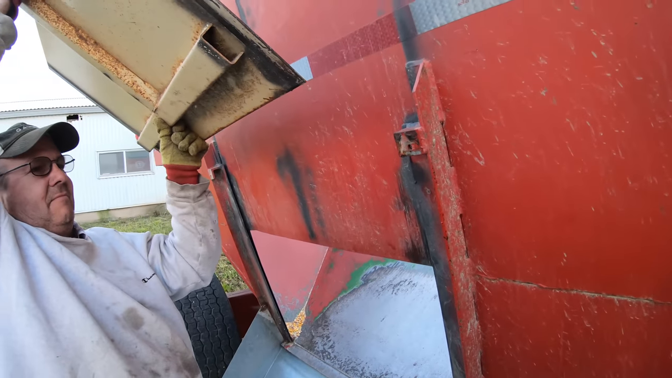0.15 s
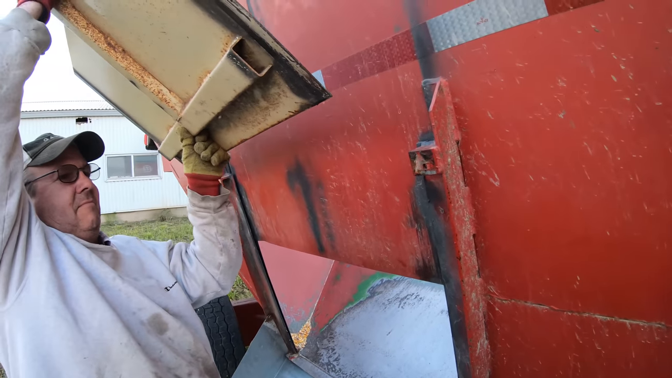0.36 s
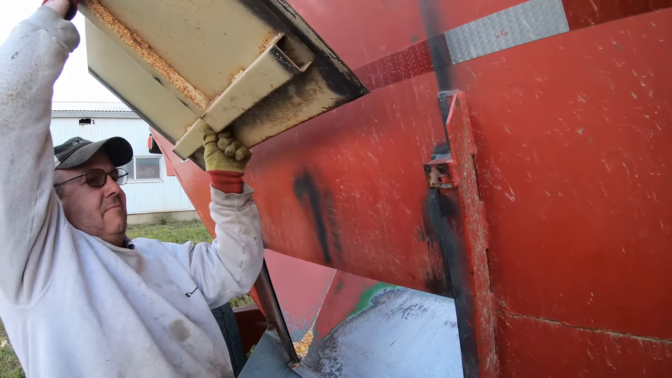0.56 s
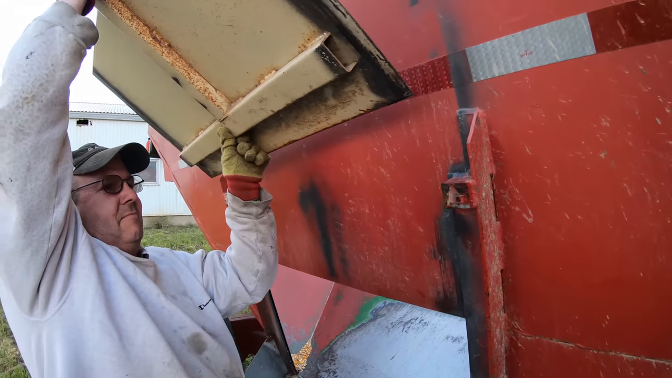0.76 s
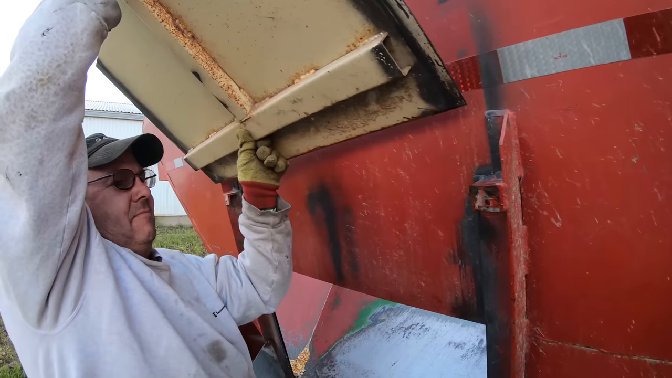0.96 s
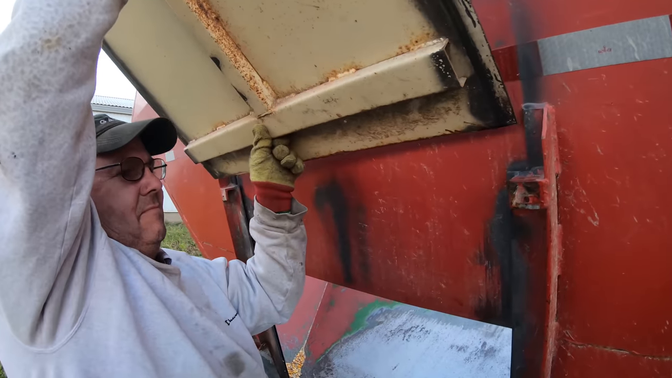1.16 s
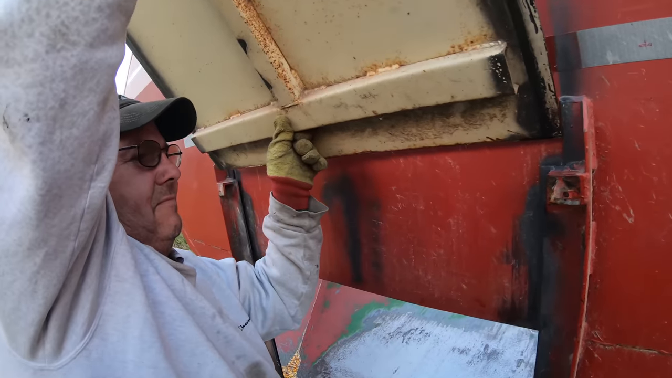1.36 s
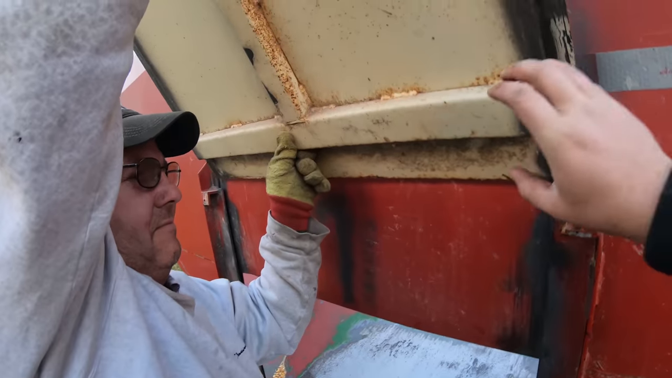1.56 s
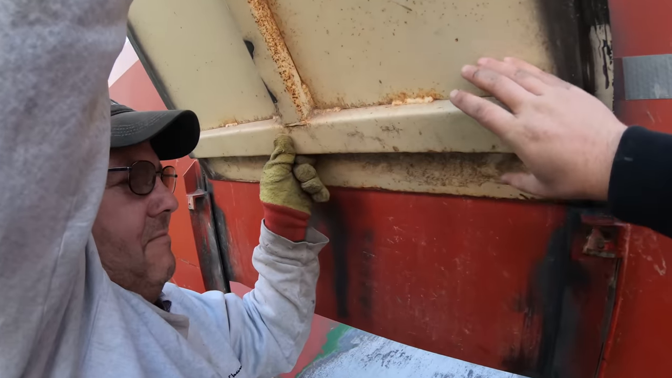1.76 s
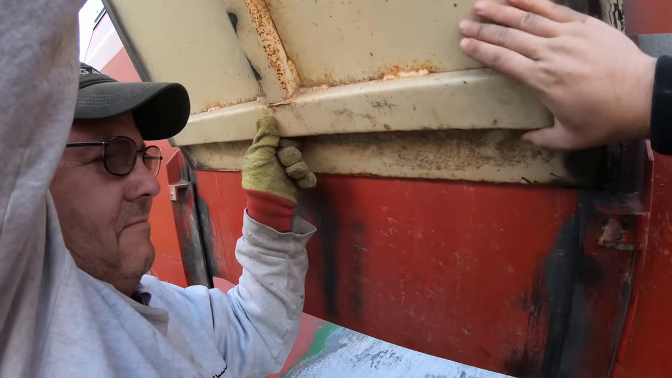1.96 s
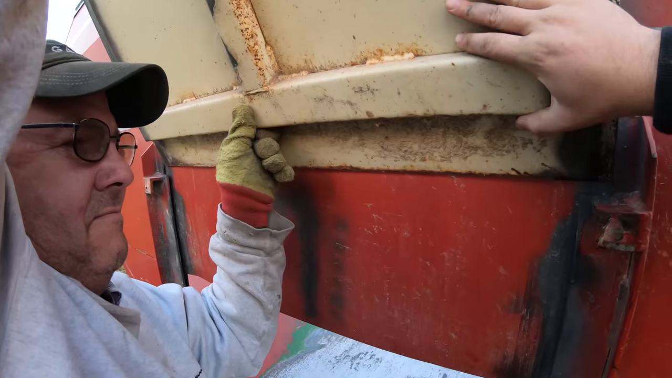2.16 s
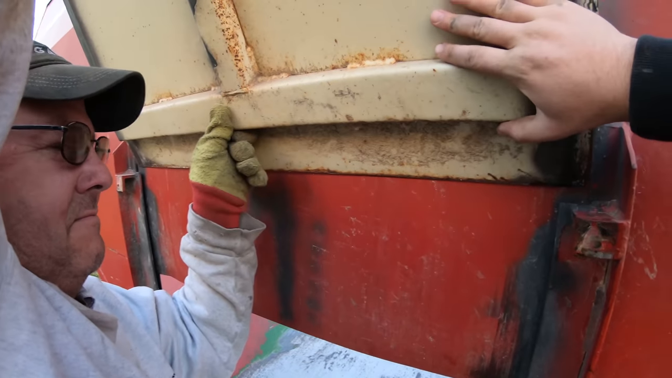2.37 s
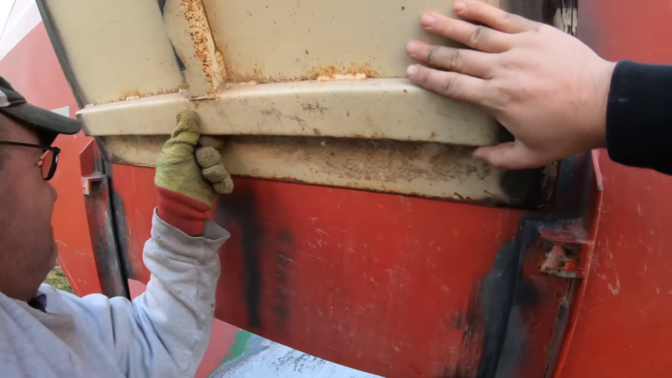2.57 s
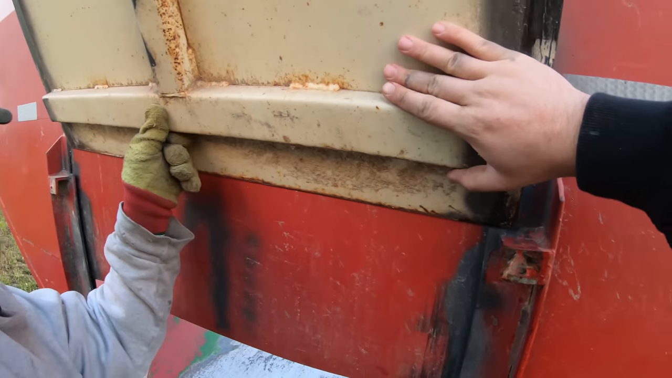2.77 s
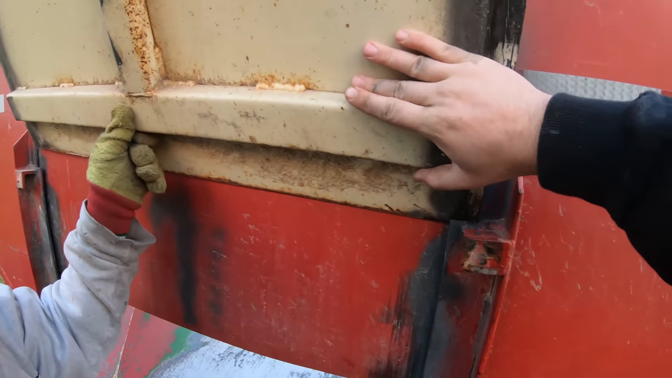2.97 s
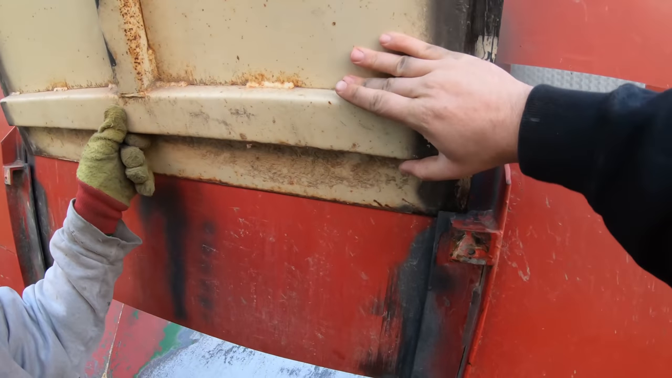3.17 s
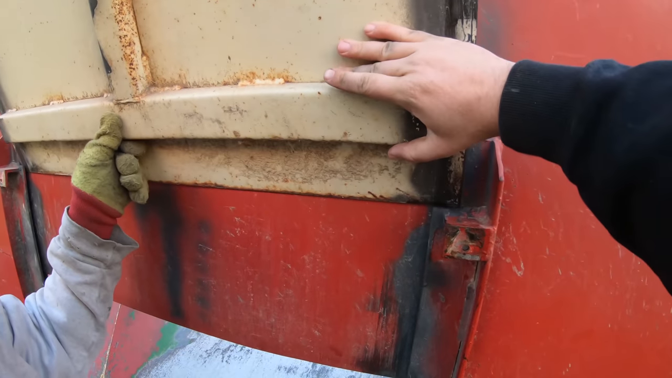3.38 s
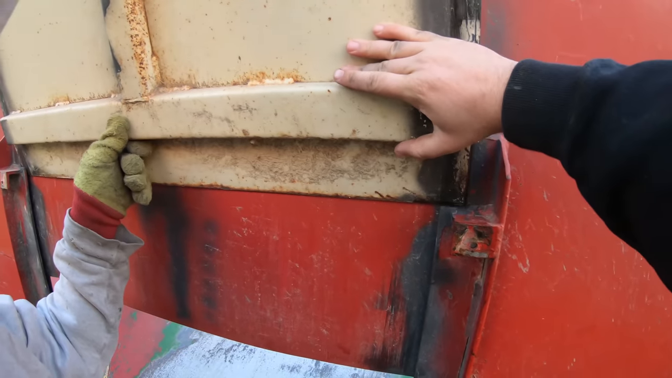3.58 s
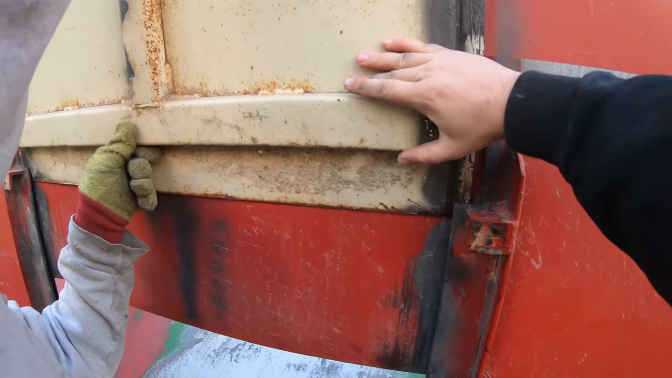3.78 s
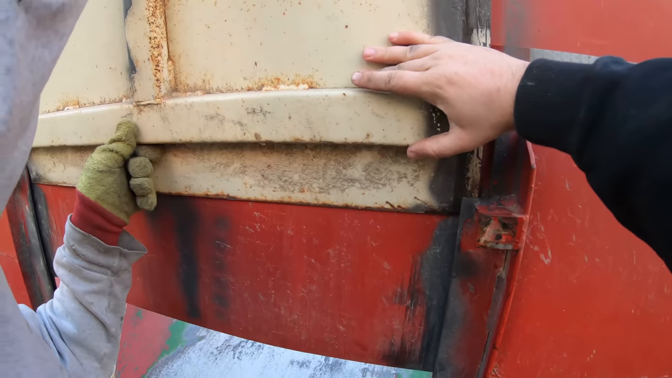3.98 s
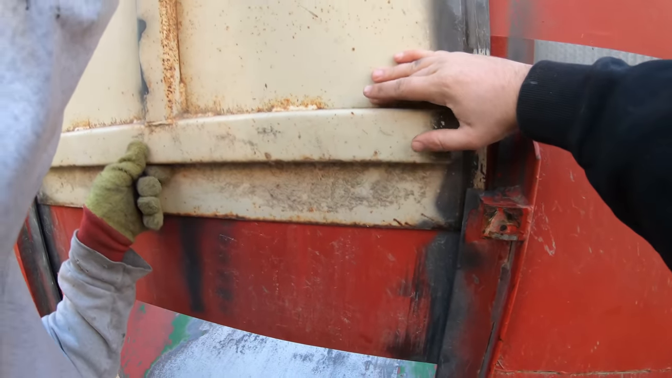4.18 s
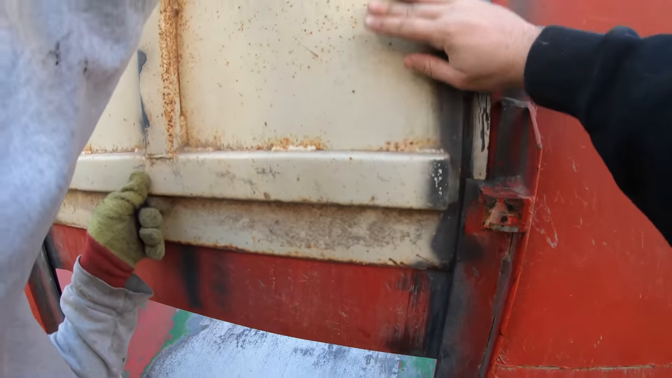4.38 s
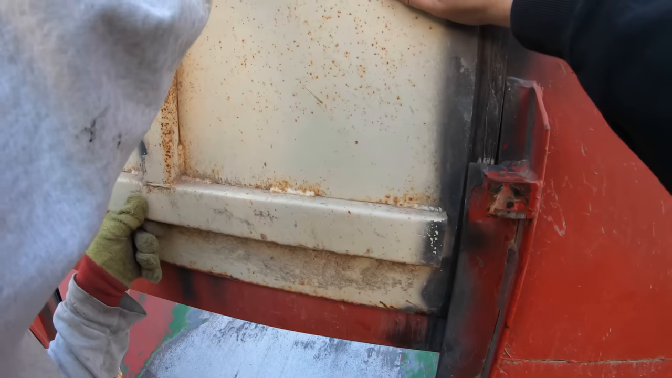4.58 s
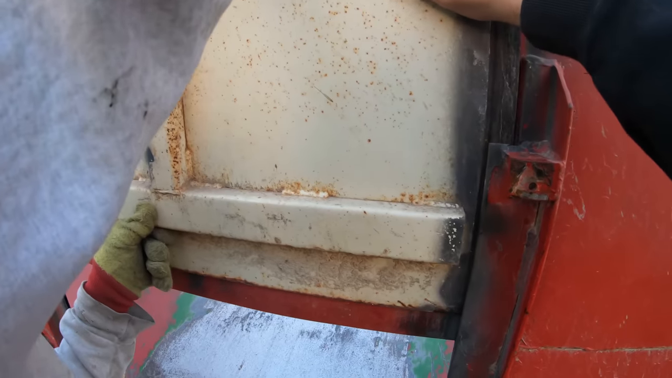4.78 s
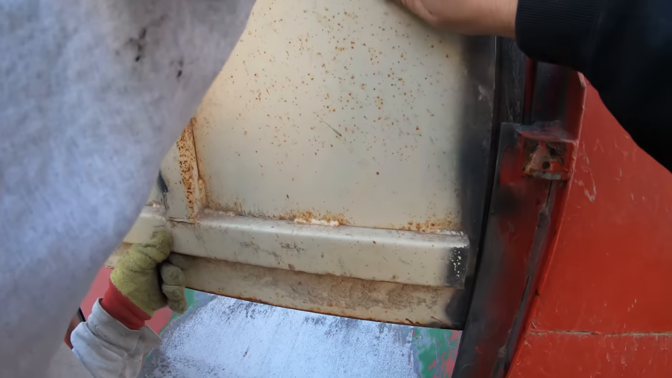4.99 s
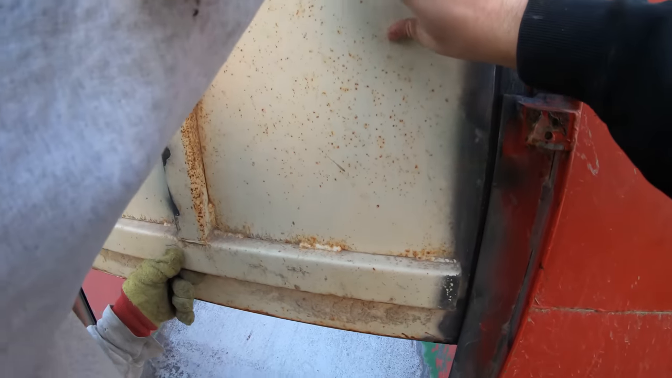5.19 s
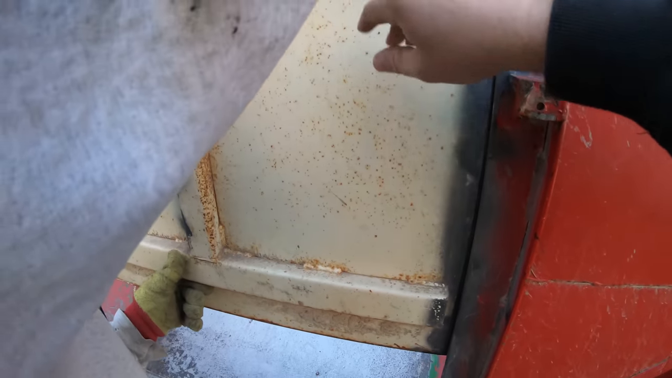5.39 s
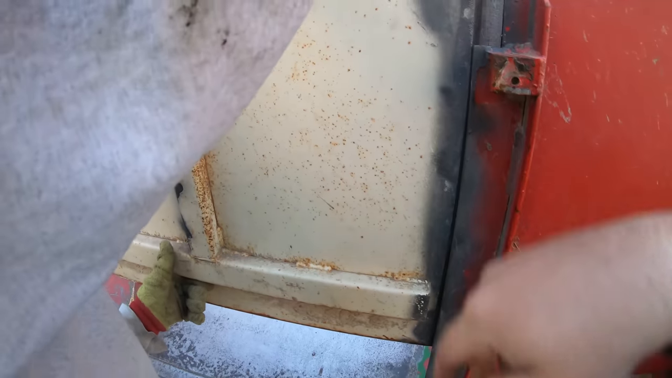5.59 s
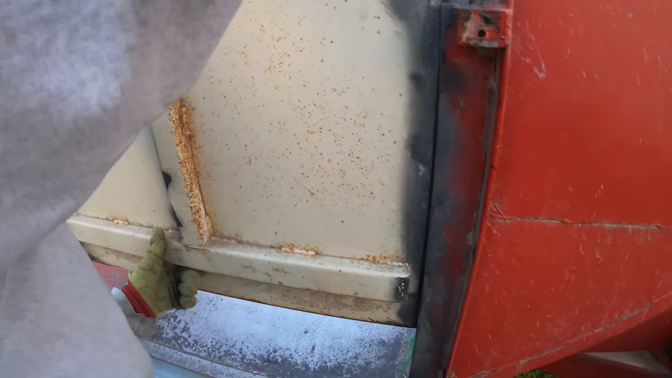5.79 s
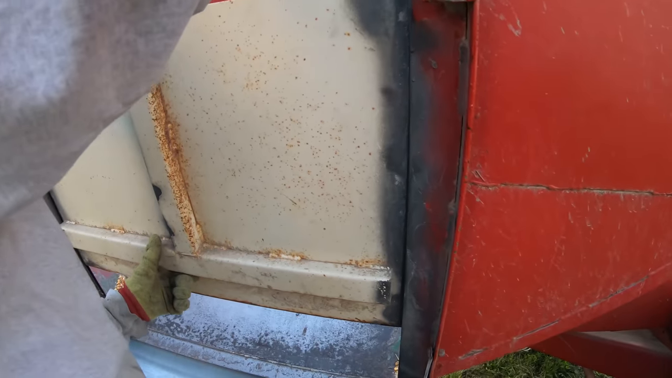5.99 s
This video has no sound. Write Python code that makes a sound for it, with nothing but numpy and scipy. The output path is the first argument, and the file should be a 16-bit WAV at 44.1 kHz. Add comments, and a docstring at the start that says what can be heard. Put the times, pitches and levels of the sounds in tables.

```python
"""A heavy steel slide gate is worked down its rusty track by hand, outdoors on a farm.
From the start: quiet yard air (steady noise) and light wind on the microphone (swaying low noise).
From 1.4 s the plate knocks in its track (struck modes) and scuffs (streams of tiny blows on those modes).
At 2.1 s its edge squeaks (stick-slip pulses in resonances), again very faintly at 2.8 s.
From 4 s it grinds downward on the scuffs' mechanism, catching and banging to the end."""
import sys
import numpy as np
from scipy import signal
from scipy.fft import rfft, irfft, next_fast_len
from scipy.io import wavfile

SR = 44100
rng = np.random.default_rng(int(sys.argv[2]) if len(sys.argv) > 2 else 0)


def write(x):
    x = np.atleast_2d(x).T
    wavfile.write(sys.argv[1], SR, np.round(np.clip(x, -1, 1) * 32767).astype(np.int16))


N = 266452
T = np.arange(N) / SR
RING_T = T[:SR]   # one second for each ring

# wind on the microphone: time_s, sway_db, rumble_db (before trim and gusts)
WIND = [(0.25, -16.5, -47.5), (0.7, -25, -45.5), (1.1, -24, -53.5), (1.7, -28, -48), (2.6, -24.5, -34),
        (2.9, -31, -43), (3.8, -22.5, -42.5), (4.1, -33.5, -43.5), (6.04, -18, -43.5)]
# wind rumble spectrum: freq_hz, relative_db_per_hz
WIND_COLOUR = [(8, -2), (22, 0.5), (40, -2), (70, -12), (130, -20), (300, -34.5), (1000, -84)]
# slow pressure swings, below hearing: freq_hz, relative_db_per_hz
SWAY_COLOUR = [(1, -15), (4, 0), (7, -2), (12, -18), (20, -45), (60, -110)]
# outdoor background spectrum: freq_hz, relative_db_per_hz
YARD_COLOUR = [(47, -34), (80, 5), (186, 0.5), (316, -3.5), (422, -3.5), (629, -8.5), (1250, -8.5),
               (1460, -12), (1600, -11.5), (3000, -20), (7000, -25), (16000, -32)]
YARD_DB = -55

# strongest plate modes: freq_hz, level_db, t60_s
PLATE_MODES = [(85.3, -16.5, 0.63), (130.5, -4, 0.9), (155.3, 3.5, 0.14), (170.3, -4.5, 0.61),
               (212.7, -7.5, 0.59), (245.5, -9, 0.41), (346, -1.5, 0.39), (364.5, -1, 0.77),
               (461.8, 8, 0.2), (533, -8, 1), (578, 0, 0.64), (637, -2.5, 0.47), (780, 3, 0.39),
               (751, -1, 0.14), (800, -6, 0.16), (946, 4.5, 0.16), (1061, 0, 0.29), (1020, 3, 0.26),
               (1126, 9, 0.06), (1271, 5.5, 0.21), (1386, -20, 0.86), (1520, -4, 0.33), (1908, -7, 0.13),
               (2260, -12, 0.29), (2814, -8, 0.2), (3146, -5.5, 0.041), (3340, -6, 0.11), (4350, -20, 0.34),
               (5950, -19, 0.24)]
# crowd of weaker modes, also the crunch spectrum: freq_hz, level_db
CROWD = [(70, -11), (200, -11), (300, -9.5), (470, -2.5), (700, -9), (860, -9), (1150, -7.5), (1650, -12),
         (2200, -19.5), (3400, -19), (6000, -26.5), (8500, -24.5), (10500, -35.5), (16000, -34)]
# decay of the crowd: freq_hz, t60_s
CROWD_T60 = [(70, 0.47), (300, 0.75), (1200, 0.49), (2500, 0.23), (5000, 0.13), (16000, 0.12)]
# registers of the plate, boom to edge: low_hz, high_hz
REGISTERS_HZ = [(65, 280), (280, 750), (750, 2000), (2000, 5500), (5500, 17000)]

# plate knocks on the track: time_s, strength_db, boom_re_strength_db, brightness_db_per_octave, seat_s
KNOCKS = [(1.401,-46,-6,2.5,0.016), (1.527,-49.5,-12,2,0.0021), (1.576,-38,3,2.2,0.0033),
          (1.706,-31.5,-3,-2,0.0018), (1.731,-22.5,7,-2.5,0.0012), (2.241,-20,-3,3.5,0.00022),
          (2.326,-23,5,-2.5,0.00062), (2.386,-26.5,-2,-1.55,0.0022), (3.007,-34,11,1,0.0055),
          (3.068,-43,18,5.5,0.0015), (3.241,-39,4.5,-1.8,0.0029), (3.364,-37.5,-4,-0.1,0.0078),
          (3.425,-49.5,9.5,2.4,0.0054), (3.713,-30.5,0,1.5,0.0064), (4.226,-26,-11,1.4,0.013),
          (4.301,-21,-1,1.5,0.0023), (4.362,-17,1.5,2.5,0.00072), (4.394,-32,6,5.5,0.0024),
          (4.583,-12.5,-4.5,-2,0.00074), (4.607,-25.5,3,1.2,0.0014), (4.642,-35.5,18.5,-1,.001),
          (4.762,-33.5,5,-8,.0024), (5.317,-23.5,-3.5,-1,0.0043), (5.4,-15.5,-0.5,-1,0.00046),
          (5.429,-29.5,8.5,-5,0.0018), (5.547,-26.5,9,-4,0.00047)]
# average knock, above the boom: freq_hz, register_level_db
KNOCK_COLOUR = [(460, 0.5), (1200, -0.14), (3300, -7.5), (9700, -20.5)]
# main flexing tone, set by where the rails hold the plate: time_s, pitch_hz
FLEX = [(1.73, 170), (2.24, 133.8), (3.0, 174), (3.71, 179.4), (4.36, 150), (4.58, 171.2), (4.77, 167),
        (5.4, 131.6), (5.55, 174)]
PIVOT_HZ = 696   # brightness tilts a knock about this pitch
JOLT_HZ, JOLT_DB, JOLT_T60_S = 32, -7, 0.46   # low thud that a knock sends to the microphone
KNOCK_TOP_HZ = 12500   # paint and rust dull the very top of a blow

# low rumble of the moving plate: time_s, level_db
RUMBLE = [(1.4, -60), (1.7, -34), (1.95, -28.5), (2.5, -31.5), (2.8, -38.5), (3.95, -41), (4.7, -22.5),
          (5.3, -28.5), (6.04, -31)]
# brief scuffs while the gate is lined up: start_s, length_s, grind_db, hiss_db
SCUFFS = [(1.741, .005, -43, -48), (1.78, 0.054, -43, -60), (1.938, 0.038, -35, -57),
          (2.041, .06, -35, -49), (2.188, 0.046, -39, -53.5), (2.52, 0.085, -47, -57.5),
          (2.631, 0.064, -41, -52.5), (2.919, 0.06, -48.5, -62), (3.078, .005, -40, -45),
          (3.659, 0.05, -44.5, -56.5), (3.762, 0.039, -55, -57.5), (3.976, 0.017, -38, -45)]
SCUFF_RISE_DB_PER_S, SCUFF_FALL_DB_PER_S = 350, 302
# long uneven slide down the track: time_s, grind_db, grit_hiss_db
SLIDE = [(4.04, -40.5, -83), (4.09, -29.5, -61), (4.2, -23.5, -45.5), (4.25, -17.5, -34), (4.3, -19.5, -40),
         (4.36, -35, -42.5), (4.53, -20.5, -31.5), (4.69, -38.5, -52), (4.8, -27.5, -44.5), (4.9, -24, -43),
         (4.98, -20, -39.5), (5.11, -23, -43.5), (5.22, -24.5, -33), (5.53, -29, -44.5),
         (5.66, -50.5, -57.5), (5.79, -26.5, -42.5), (5.96, -27, -36.5), (6.04, -30.5, -41)]
# rail chatter under the sliding plate: time_s, pitch_hz
CHATTER = [(4.05, 606.7), (4.25, 671.5), (4.55, 537.4), (4.85, 604), (4.98, 760), (5.1, 894.4), (5.2, 805),
           (5.45, 720), (5.7, 575.2), (6.04, 943)]
# colour of the scrape: freq_hz, gain_db
SCRAPE_COLOUR = [(60, 0), (150, -1), (300, -5.5), (600, -8), (1200, -6.5), (2200, -0.5), (3500, -1.5),
                 (5500, -2.5), (8500, -3), (10500, -3.5), (13000, -3), (16000, -12)]

# dry squeaks of the edge: start_s, length_s, level_db, peak_slips_per_s
SQUEAKS = [(2.075, .04, -31.5, 150), (2.762, .11, -63.5, 430)]
# resonances of the squeaking edge: freq_hz, single_pass_width_hz, level_db
SQUEAK_MODES = [(1060, 360, 4.5), (1330, 140, 5), (2110, 200, 8.5), (2422, 170, 6.5), (3170, 150, -3),
                (3900, 200, -7), (6100, 280, -5.5), (7600, 700, -16.5)]
SQUEAK_RISE_DB_PER_S, SQUEAK_FALL_DB_PER_S = 240, 115
SLIP_OCTAVES_PER_DB = 0.4   # slips slow down as the squeak weakens

CUTOFF_HZ = 15850


def from_db(db):
    """Decibels to gain."""
    return 10 ** (np.asarray(db) / 20)


def rms_one(x):
    """x scaled to unit rms."""
    return x / np.sqrt(np.mean(x ** 2) + 1e-20)


def in_time(rows):
    """The columns of a curve, sample by sample."""
    time_s, *columns = np.transpose(rows)
    return [np.interp(T, time_s, column) for column in columns]


def at_hz(points, hz):
    """A curve read on a log-frequency axis."""
    point_hz, value = np.transpose(points)
    return np.interp(np.log(np.maximum(hz, 1)), np.log(point_hz), value)


def coloured(x, spectrum):
    """x shaped by a smooth spectrum."""
    size = next_fast_len(len(x) + 4096, True)
    gain = from_db(at_hz(spectrum, np.fft.rfftfreq(size, 1 / SR)))
    return irfft(rfft(x, size) * gain, size)[:len(x)]


def noise(spectrum, size=N):
    """Coloured noise of unit rms."""
    return rms_one(coloured(rng.standard_normal(size), spectrum))


def drift(rate_per_s):
    """Chance curve of unit rms: random points, rate_per_s of them a second, joined by lines."""
    return rms_one(np.interp(T * rate_per_s, np.arange(4096), rng.standard_normal(4096)))


def swell(start_s, length_s, rise_db_per_s, fall_db_per_s):
    """Rise, hold and fall of one rub, in dB below its top."""
    before_s = np.maximum(start_s - T, 0)
    after_s = np.maximum(T - start_s - length_s, 0)
    return -np.minimum(rise_db_per_s * before_s + fall_db_per_s * after_s, 120)


def decay(t60_s):
    """Exponential decay, 60 dB in t60_s."""
    return np.exp(-np.log(1000) * RING_T / t60_s)


def dying_tone(hz, t60_s):
    """One struck sine, dying away."""
    return np.sin(2 * np.pi * hz * RING_T) * decay(t60_s)


def outdoors(gust_db=6.5, gusts_per_s=7.8, rumble_trim_db=6.0):
    """Quiet yard air, and lumpy wind pressure on the microphone."""
    sway_db, rumble_db = in_time(WIND)
    gusty_db = rumble_db + rumble_trim_db + gust_db * drift(gusts_per_s)
    rumble = from_db(gusty_db) * noise(WIND_COLOUR)
    sway = from_db(sway_db) * noise(SWAY_COLOUR)
    ease_in = np.minimum(T / .03, 1)
    return ease_in * (rumble + sway) + from_db(YARD_DB) * noise(YARD_COLOUR)


def plate_modes(count=420):
    """Every plate mode as a decaying sine; weak ones crowd in between the strong ones."""
    place = (np.arange(count) + rng.random(count)) / count
    crowd_hz = 70 + 16000 * place ** 2
    crowd = np.c_[crowd_hz, at_hz(CROWD, crowd_hz), at_hz(CROWD_T60, crowd_hz)]
    hz, db, t60_s = np.vstack([PLATE_MODES, crowd]).T[:, :, None].astype(np.float32)
    t = RING_T.astype(np.float32)
    return from_db(db) * np.exp(-float(np.log(1000)) * t / t60_s) * np.sin(2 * np.pi * hz * t)


def touch(modes, crunch_db, crunch_t60_s, vary_db=4.0):
    """Response to one contact, by register: each spot weights the modes anew, and rust crunches under it."""
    signs = rng.choice([-1, 1], len(modes))
    weights = signs * from_db(vary_db * rng.standard_normal(len(modes)))
    ring = weights.astype(np.float32) @ modes
    crunch = from_db(crunch_db) * noise(CROWD, size=len(RING_T)) * decay(crunch_t60_s)
    bands = [signal.butter(3, edges_hz, "band", fs=SR, output="sos") for edges_hz in REGISTERS_HZ]
    return np.array([signal.sosfilt(band, ring + crunch) for band in bands])


def knocks(modes, flex_db=-0.9, flex_t60_s=0.4, boom_db=-1.5):
    """The plate swings against the track; edge-on blows are bright, flat ones boom, glancing ones seat slowly."""
    out = np.zeros(N + len(RING_T))
    centres_hz = np.sqrt(np.prod(REGISTERS_HZ, axis=1))
    jolt = from_db(JOLT_DB) * dying_tone(JOLT_HZ, JOLT_T60_S)
    for time_s, strength_db, boom_re_strength_db, brightness_db_per_octave, seat_s in KNOCKS:
        tilt_db = brightness_db_per_octave * np.log2(centres_hz / PIVOT_HZ)
        register_db = at_hz(KNOCK_COLOUR, centres_hz) + tilt_db
        register_db[0] = boom_re_strength_db
        seating = 1 - np.exp(-RING_T / seat_s)
        response = touch(modes, crunch_db=13.5, crunch_t60_s=0.086) * seating
        # level each register over its first 25 ms
        response /= np.std(response[:, :SR // 40], axis=1, keepdims=True)
        # much of the boom is the whole plate flexing between the rails
        flex_hz = np.interp(time_s, *np.transpose(FLEX))
        flex = seating * dying_tone(flex_hz, flex_t60_s)
        response[0] = from_db(boom_db) * response[0] + from_db(flex_db) * flex
        start = round(time_s * SR)
        blow = from_db(register_db) @ response + jolt
        out[start:start + len(RING_T)] += from_db(strength_db) * blow
    return signal.sosfilt(signal.butter(2, KNOCK_TOP_HZ, fs=SR, output="sos"), out[:N])


def friction():
    """Force of the rubbing in each register: a few scuffs, then the long slide."""
    lead_in_db = swell(SLIDE[0][0], N / SR, SCUFF_RISE_DB_PER_S, SCUFF_FALL_DB_PER_S)
    grind_db, hiss_db = in_time(SLIDE) + lead_in_db
    for start_s, length_s, scuff_grind_db, scuff_hiss_db in SCUFFS:
        shape_db = swell(start_s, length_s, SCUFF_RISE_DB_PER_S, SCUFF_FALL_DB_PER_S)
        grind_db = np.maximum(grind_db, scuff_grind_db + shape_db)
        hiss_db = np.maximum(hiss_db, scuff_hiss_db + shape_db)
    rumble_db, = in_time(RUMBLE)
    return from_db([rumble_db, grind_db, grind_db, (grind_db + hiss_db) / 2, hiss_db])


def chatter(catches, half_width_hz=110):
    """The catches set the rail chattering in a narrow band that moves with the contact."""
    pitch_hz, = in_time(CHATTER)
    lowpass = signal.butter(2, half_width_hz, fs=SR, output="sos")
    envelope = signal.sosfilt(lowpass, catches)
    return rms_one(envelope * np.cos(2 * np.pi * np.cumsum(pitch_hz) / SR))


def scrape(modes, catches_per_s=5000, size_db=4.0, judder_db=1.5, judders_per_s=55,
           shift_db=5.5, shifts_per_s=14, chatter_db=-13, spots=4):
    """Rust grains catch and let go at a few high spots; the uneven stream of tiny blows rings the plate."""
    force = friction() * from_db(judder_db * drift(judders_per_s))
    # the load keeps shifting from spot to spot, and each spot has its own colour
    loads = from_db([shift_db * drift(shifts_per_s) for _ in range(spots)])
    moving = T > RUMBLE[0][0]
    out = 0
    for load in loads / np.linalg.norm(loads, axis=0):
        spread_db = size_db * np.minimum(rng.exponential(1, N), 4)
        sizes = rng.standard_normal(N) * from_db(spread_db)
        catches = rms_one(sizes * (rng.random(N) < catches_per_s / SR))
        drive = load * (catches + from_db(chatter_db) * chatter(catches)) * moving
        response = touch(modes, crunch_db=22.0, crunch_t60_s=0.048, vary_db=4.5)
        response /= np.linalg.norm(response, axis=1, keepdims=True)
        rung = signal.fftconvolve(np.float32(drive * force), np.float32(response), axes=1)
        out = out + rung.sum(0)[:N]
    return coloured(out, SCRAPE_COLOUR)


def squeak(jitter=0.15, jitters_per_s=220, uneven_db=4.0, rasp=0.11):
    """The dry edge sticks and slips in quick uneven steps, faster as it presses harder."""
    total = 0
    for start_s, length_s, level_db, peak_slips_per_s in SQUEAKS:
        shape_db = swell(start_s, length_s, SQUEAK_RISE_DB_PER_S, SQUEAK_FALL_DB_PER_S)
        slips_per_s = peak_slips_per_s * 2 ** (SLIP_OCTAVES_PER_DB * np.maximum(shape_db, -20))
        uneven_rate = slips_per_s * np.exp(jitter * drift(jitters_per_s))
        steps = np.floor(np.cumsum(uneven_rate) / SR)
        slips = np.diff(steps, prepend=0) * from_db(uneven_db * rng.standard_normal(N))
        slips = slips + rasp * rng.standard_normal(N)
        out = 0
        for hz, width_hz, db in SQUEAK_MODES:
            # each resonance acts twice, which leaves deep valleys between them
            b, a = signal.iirpeak(hz, hz / width_hz, fs=SR)
            out = out + from_db(db) * signal.lfilter(b, a, signal.lfilter(b, a, slips))
        total = total + rms_one(out) * from_db(level_db + shape_db)
    return total


def scene():
    """The gate close by, in open air; knocks and scraping ring the same plate."""
    modes = plate_modes()
    return (outdoors() + knocks(modes) + scrape(modes) + squeak())[None]


def record(dry):
    """The loudest peaks are rounded and the top is cut."""
    rounded = dry / (1 + np.abs(dry / .95) ** 6) ** (1 / 6)
    lowpass = signal.ellip(12, .1, 90, CUTOFF_HZ, fs=SR, output="sos")
    return signal.sosfilt(lowpass, rounded)


dry = scene()
out = record(dry)
write(out)
```